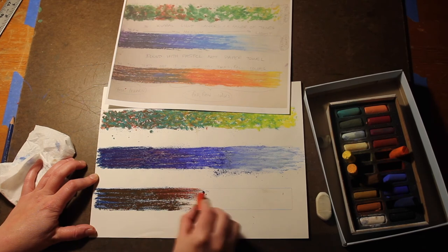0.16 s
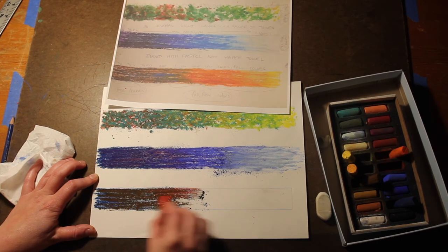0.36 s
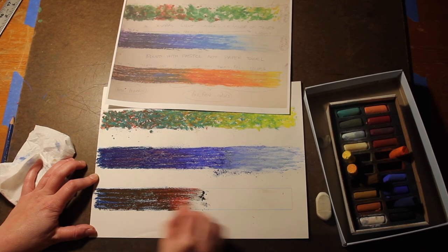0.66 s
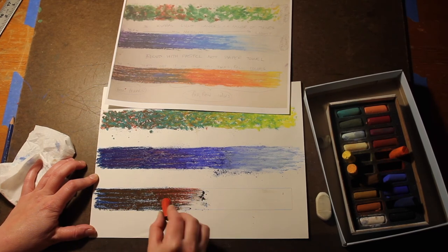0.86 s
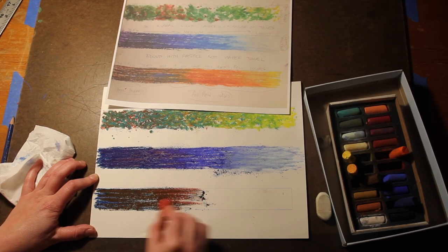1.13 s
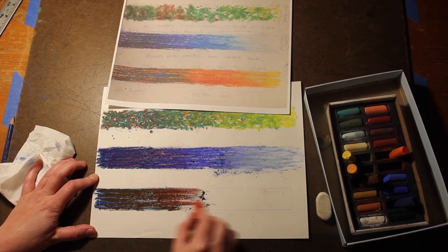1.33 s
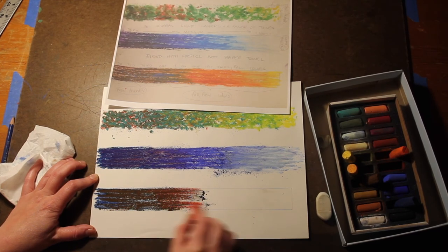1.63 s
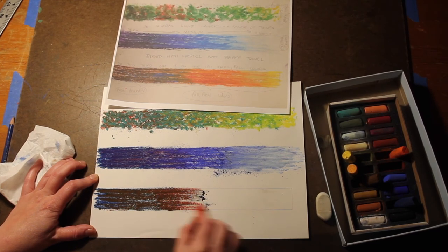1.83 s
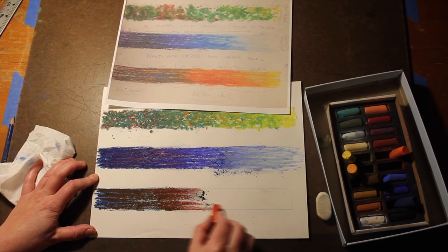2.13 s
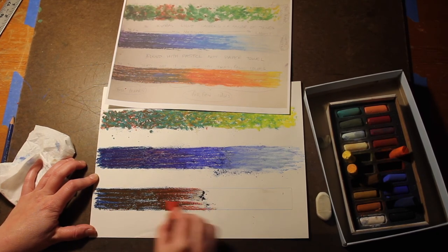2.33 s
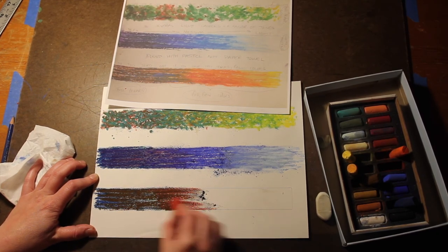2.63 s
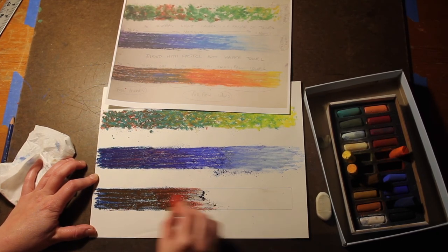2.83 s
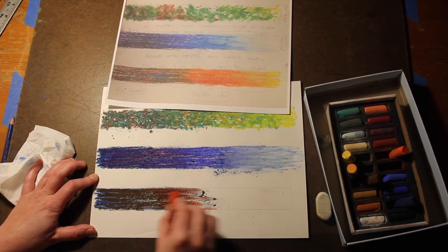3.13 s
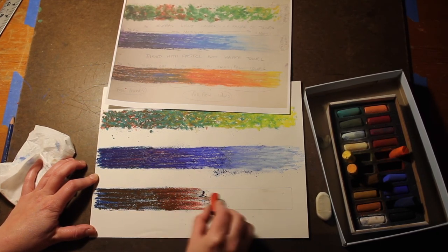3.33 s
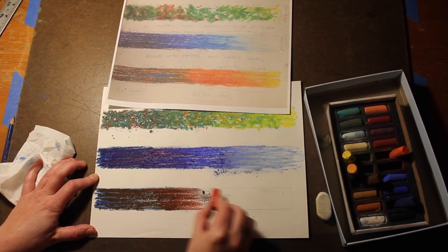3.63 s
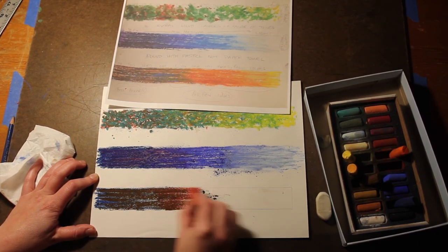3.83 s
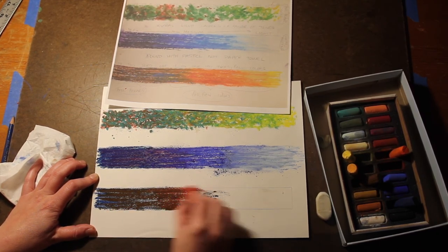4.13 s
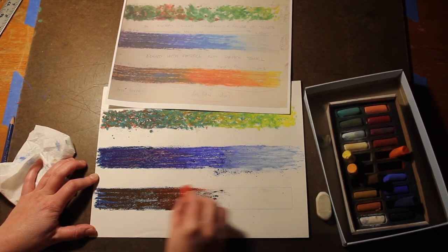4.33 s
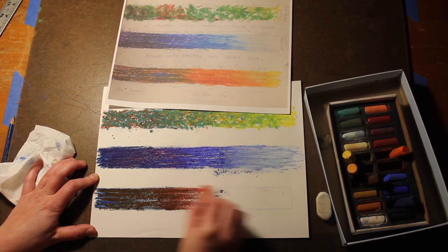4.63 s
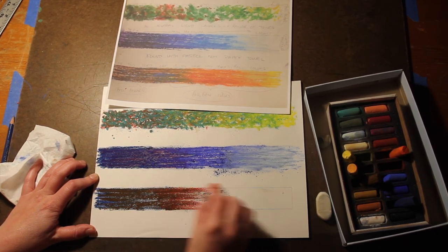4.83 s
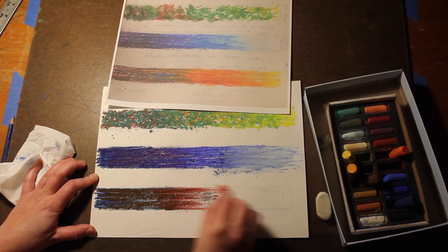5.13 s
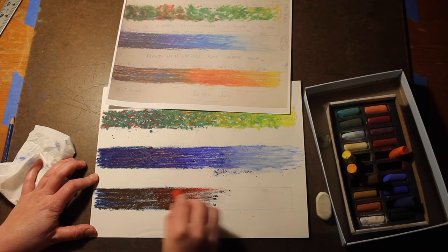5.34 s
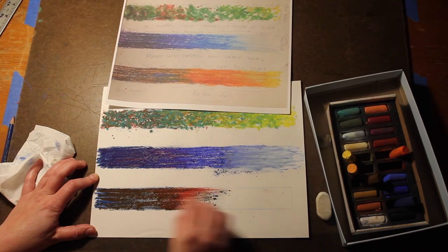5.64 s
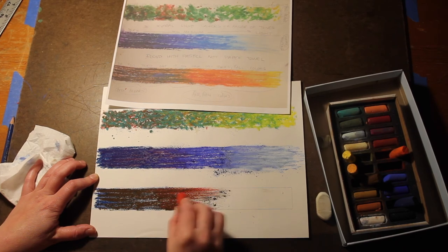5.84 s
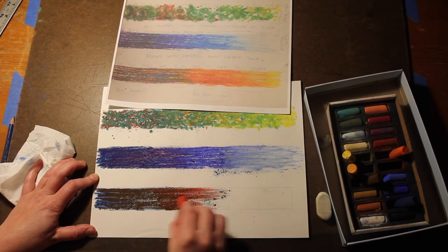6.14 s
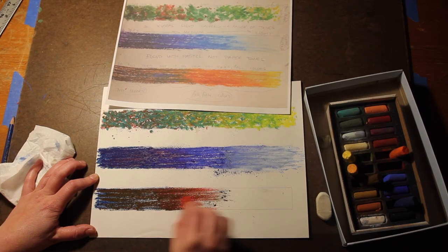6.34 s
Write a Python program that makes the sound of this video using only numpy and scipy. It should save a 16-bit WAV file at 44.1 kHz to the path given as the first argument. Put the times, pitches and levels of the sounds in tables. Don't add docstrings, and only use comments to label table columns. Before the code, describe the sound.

Quick repeated strokes of a chalky stick on paper, each about a tenth of a second, gritty and dry, with wooden resonance below fine fibre and dust hiss. Loud taps mark some landings early on, then mostly plain scratching until a firm tap near the end; late strokes swell harder. Beneath is a quiet, hollow fan and duct hum in a small-tailed room, heard close from above with thin bass.

```python
import sys
import numpy as np
from scipy import signal
from scipy.fft import rfft, irfft
from scipy.io import wavfile
from scipy.ndimage import uniform_filter1d

SR = 44100
rng = np.random.default_rng(int(sys.argv[2]) if len(sys.argv) > 2 else 0)


def boost(x):
    u = np.asarray(x, float) / 20
    return 10 ** u


def store_wav(level_fs):
    pcm = np.round(np.clip(np.atleast_2d(level_fs), -1, 1) * 32767)
    wavfile.write(sys.argv[1], SR, pcm.T.astype(np.int16))


N = 285768


def level(x, db):
    return x * boost(db) / np.sqrt(np.mean(x ** 2))


def colour(x, points):
    hz, db = np.transpose(points)
    axis = np.maximum(np.arange(len(x) // 2 + 1) * SR / len(x), 1)
    gain_db = np.interp(np.log(axis), np.log(hz), db)
    return irfft(rfft(x) * boost(gain_db), len(x))


def walk(rate):
    hold = int(SR / rate)
    steps = np.repeat(rng.standard_normal(N // hold + 1), hold)
    return 1.55 * uniform_filter1d(uniform_filter1d(steps, hold), hold)[:N]


def mottle(x, db, size, hold):
    spec = signal.stft(x, nperseg=size)[2]
    field = uniform_filter1d(rng.standard_normal(spec.shape), hold, axis=1)
    field = uniform_filter1d(field, 2, axis=0)
    patchy = spec * boost(db * field / np.std(field))
    return level(signal.istft(patchy, nperseg=size)[1][:N], 0)


def resonate(x, modes):
    out = 0
    for hz, width, db in modes:
        b, a = signal.iirpeak(hz, hz / width, SR)
        twice = signal.lfilter(b, a, signal.lfilter(b, a, x))
        out = out + level(twice, db)
    return out


def bell(x, centre, width):
    return np.exp(-((x - centre) / width) ** 2 / 2)


# (f/Hz, level/dB)
AIR_SPECTRUM = [(40, -60.5), (110, -38), (240, -24), (300, -16.5), (530, -15), (560, -9), (790, -1),
                (1030, -6.5), (1110, -17.5), (2400, -27), (4700, -39.5), (6500, -43.5), (11000, -52.5),
                (16000, -67)]
# (f/Hz, width/Hz, level/dB)
DUCT_MODES = [(667.2, 29, -57.5), (738.4, 27, -56), (798.5, 20, -57), (866, 56, -81.5), (1017, 49, -60),
              (4140, 500, -78.5), (8080, 310, -103)]
# (t/s, drone level/dB, rumble level/dB)
DUCT_DRIFT = [
    (0.0, -48.5, -78),
    (2.29, -49, -73.5),
    (2.56, -48.5, -104),
    (2.99, -49, -88),
    (3.9, -49.5, -84.5),
    (4.389, -49, -104),
    (4.76, -49, -83),
    (5.38, -49.5, -91),
    (5.68, -48.5, -81),
    (6.48, -49, -86),
]
# (f/Hz, level/dB)
FAN_TONES = [(91.5, -74.5), (577, -58.5)]


def ventilation():
    t = np.arange(N) / SR
    s, drone_db, rumble_db = np.transpose(DUCT_DRIFT)
    swell = boost(np.interp(t, s, drone_db - np.mean(drone_db)))
    rumble = boost(np.interp(t, s, rumble_db - np.max(rumble_db)))
    patchy_air = mottle(rng.standard_normal(N), 4.04, size=1024, hold=4)
    air = level(colour(patchy_air, AIR_SPECTRUM), -49.5)
    duct = resonate(rng.standard_normal(N), DUCT_MODES)
    tones = []
    for hz, db in FAN_TONES:
        phase = 2 * np.pi * np.cumsum(hz + 0.4 * walk(5)) / SR
        tones.append(boost(db + 0.7 * walk(6)) * np.sin(phase))
    shaft, blade = tones
    return swell * (air + duct + blade) + rumble * shaft


def grit(spread_db, flicker_db, rate):
    size = boost(spread_db * rng.exponential(1, N))
    return level(rng.standard_normal(N) * size * boost(flicker_db * walk(rate)), 0)


def sweep(age, rise_s, length_s, swell_db, fall_db_per_s, knee_s):
    rise = (1 - np.exp(-age / rise_s)) / (1 - np.exp(-length_s / rise_s))
    slant_db = swell_db * (np.minimum(age / length_s, 1) - 1)
    fall_db = fall_db_per_s * knee_s * np.logaddexp(0, (age - length_s) / knee_s)
    return rise ** 2 * boost(slant_db - fall_db)


def contact_span(s):
    at = slice(max(int(s * SR), 0), min(int(s * SR) + SR // 2, N))
    return at, np.maximum(np.arange(N)[at] / SR - s, 0)


# (t/s, contact/s, lift-off level/dB, swell over the contact/dB, early low modes over pressure/dB)
STROKES = [(-0.16, 0.097, -28.0, 5, -4.0), (0.139, 0.068, -29, -1, -9.5), (0.42, 0.075, -27.5, 2.5, -6),
           (0.689, 0.073, -26.6, 4.2, -5), (1.008, 0.046, -24, 10.5, -11), (1.25, 0.13, -30, -2, -8.2),
           (1.537, 0.11, -25, 8, -13), (1.813, 0.12, -28, -0.9, -9.5), (2.101, 0.12, -28, -2.5, -10.5),
           (2.402, 0.083, -28, 0, -5.5), (2.686, 0.078, -29, 1, -6), (2.969, 0.088, -27, 5.1, -6.8),
           (3.267, 0.088, -30, -3, -5), (3.558, 0.08, -28, 3.5, -3.4), (3.867, 0.074, -25, 9, -9.5),
           (4.184, 0.077, -28.5, 2.5, -13), (4.505, 0.09, -28.3, 9, -7.5),
           (4.841, 0.064, -27.5, 15.5, -9.5), (5.128, 0.078, -23.5, 12.5, -6.5),
           (5.411, 0.087, -21.5, 16.5, -8.5), (5.675, 0.085, -21.5, 16.5, -8.5), (5.962, 0.077, -26, 3, -5),
           (6.214, 0.076, -23, 13.5, -9.5)]
# (t/s, speed-up/s, slide/s, hiss level at top speed/dB, upper modes over pressure/dB)
SLIDES = [(-0.15, 0.02, 0.095, -35.5, -2), (0.145, 0.013, 0.096, -40.5, 3.5),
          (0.428, 0.015, 0.099, -38.5, 2), (0.691, 0.081, 0.09, -34.5, 1.5),
          (1.011, 0.012, 0.07, -37.5, 1.5), (1.243, 0.093, 0.13, -38, -1.7),
          (1.555, 0.023, 0.11, -37.5, 0.8), (1.812, 0.096, 0.11, -35.5, 0),
          (2.105, 0.017, 0.12, -37.5, 0.9), (2.409, 0.017, 0.095, -37, 1.5),
          (2.678, 0.087, 0.097, -36.5, 1.5), (2.968, 0.055, 0.099, -35, 1.4), (3.264, 0.046, 0.093, -38, 0),
          (3.556, 0.083, 0.093, -36, 2), (3.867, 0.073, 0.083, -36.5, -1),
          (4.181, 0.047, 0.079, -34.5, 1.5), (4.529, 0.016, 0.1, -39, 1.0),
          (4.845, 0.046, 0.066, -35.5, 0.6), (5.136, 0.06, 0.075, -35, -1.3),
          (5.42, 0.032, 0.091, -35.5, -1.5), (5.677, 0.12, 0.089, -34, -0.8),
          (5.962, 0.043, 0.082, -34.5, 1.0), (6.226, 0.019, 0.083, -35.5, 0.4)]
# (t/s, depth 0-1.5)
BITES = [(0.17, 1.13), (0.448, 0.5), (0.72, 1.16), (1.037, 0.25), (1.283, 1.15), (1.555, 0.91),
         (1.849, 1.13), (2.127, 0.66), (2.429, 0.9), (2.717, 1.2), (3.0, 1.08), (3.299, 1.15),
         (3.588, 0.96), (3.896, 1.03), (4.208, 1), (4.533, 0.4), (4.872, 1.03), (5.159, 0.72),
         (5.447, 0.86), (5.707, 1.31), (5.992, 0.8), (6.244, 0.97)]


def pressure():
    t, out = np.arange(N) / SR, np.zeros((3, N))
    bite = sum(depth * bell(t, s, 0.0069) for s, depth in BITES)
    bite_db = 10, 4.5, 2
    fastest_db = -1, -2.5, 2
    for (s, length, db, swell_db, low_db), (*_, upper_db) in zip(STROKES, SLIDES):
        at, age = contact_span(s)
        low = low_db - 6.5 + 12.5 * np.exp(-age / 0.045)
        upper = upper_db - 0.44 - 7 * np.exp(-age / 0.012)
        tilt = np.array([low, 0 * age, upper])
        tilt = tilt + np.outer(fastest_db, bell(age / length, 0.65, 0.14))
        press = sweep(age, 0.0077, length, swell_db, fall_db_per_s=339.5, knee_s=0.0067)
        out[:, at] += boost(db + tilt) * press
    return out * boost(np.outer(bite_db, bite))


def speed():
    out = np.zeros((2, N))
    for s, rise_s, length, db, _ in SLIDES:
        at, age = contact_span(s)
        off_db = -2.5 * (1 + np.tanh((age - length - 0.015) / 0.004)) / 2
        slide = sweep(age, max(rise_s, 0.003), length, 0, fall_db_per_s=400, knee_s=0.011)
        hiss = boost(db + off_db) * slide
        dust_late_db = -4 * bell(age, 0, 0.012)
        out[:, at] += hiss, hiss * boost(dust_late_db)
    return out


# (delay t/s, level/dB)
ECHOES = [
    (.0036, -23.5),
    (.0064, -14.5),
    (0.013, -18),
]


def desk(modes, swell_s=0.00031):
    t = np.arange(SR // 10) / SR
    ring = np.zeros(len(t))
    for k, (hz, db, t60) in enumerate(modes):
        ring += (-1) ** k * boost(db - 60 * t / t60) * np.sin(2 * np.pi * hz * t)
    ring *= (1 - np.exp(-t / swell_s)) ** 2
    out = ring.copy()
    for delay, db in ECHOES:
        lag = int(delay * SR)
        out[lag:] += boost(db) * ring[:-lag]
    return out / np.sqrt(np.sum(out ** 2))


# (f/Hz, level/dB, t60/s)
DESK_MODES = [(1030, -13.5, 0.011), (1171, -10.5, 0.053), (1276, 0.5, 0.021), (1368, -3.5, 0.063),
              (1488, 0, 0.037), (1593, -2, 0.047), (1788, 3, 0.022), (1933, -10.5, 0.028),
              (2107, -3.5, 0.046), (2101, -5.5, 0.046), (2206, -7.5, 0.021), (2372, -7, 0.017),
              (2711, -4.5, 0.015), (2953, -9.5, 0.016), (3195, -11, 0.022), (3530, -10.5, 0.011),
              (3950, -9.5, 0.0063)]
# (f/Hz, level/dB per Hz)
SHEET_BODY = [(59, -75), (100, -29), (450, -11.5), (646, -4.5), (956, 4.5), (1010, 8.5), (1100, 3),
              (1430, -30), (2420, -120)]
# (f/Hz, level/dB per Hz)
FIBRE_HISS = [(2500, -21), (3800, 4.5), (5000, 6.5), (7500, 0.5), (9000, -30.5), (12000, -46)]
# (f/Hz, width/Hz, level/dB)
STICK_MODES = [(4410, 280, 2.5), (5046, 110, 0.5), (5450, 56, 7.5), (6670, 200, -5.5), (7180, 180, 4),
               (7950, 200, -1), (8790, 300, -36), (9880, 230, -6), (11000, 370, -9.5)]
# (f/Hz, level/dB per Hz)
DUST_HISS = [(6000, -24), (8500, 2), (10000, -2.5), (12500, -9), (15000, -15.5), (16500, -19)]


def strokes():
    low, middle, upper = pressure()
    fibre, late = speed()
    dust = late * (fibre / boost(-41.5)) ** 0.23
    rub = mottle(grit(2.1, 0.76, 150), 2.05, size=512, hold=5)
    out = signal.fftconvolve(low * rub, desk(DESK_MODES[:2]))[:N]
    out += signal.fftconvolve(middle * boost(0.25) * rub, desk(DESK_MODES[2:7]))[:N]
    out += signal.fftconvolve(upper * boost(-1.15) * rub, desk(DESK_MODES[7:]))[:N]
    out = colour(out, [(700, -14), (1000, 4.0), (1090, 0.5), (1200, -1.0)])
    out += low * level(colour(grit(2.1, 1.03, 60), SHEET_BODY), -11)
    slips = mottle(grit(0.93, 1.0, 200), 2.86, size=512, hold=3)
    out += fibre * level(colour(slips, FIBRE_HISS), -0.8)
    out += fibre * level(resonate(slips, STICK_MODES), -10)
    return out + dust * level(colour(slips, DUST_HISS), -5)


# (t/s, peak level/dB)
TOUCHES = [(0.421, -44), (0.6414, -67), (0.6937, -57), (1.253, -52), (1.529, -49), (1.819, -50.5),
           (2.096, -47), (2.4, -46), (3.2007, -68), (4.18, -54), (4.4894, -72), (4.8442, -60),
           (5.1346, -56), (5.3294, -70), (5.683, -55), (6.217, -46)]


def touches(decay_s=0.0036):
    t, out = np.arange(SR // 50) / SR, np.zeros(N)
    brushes = [(row[0] + 0.0043, -63.5) for row in STROKES[1:]]
    for s, db in list(TOUCHES) + brushes:
        at = int(s * SR)
        out[at:at + len(t)] += boost(db + 5) * rng.standard_normal(len(t)) * np.exp(-t / decay_s)
    return colour(out, [(500, 4), (1500, 3), (5000, 5), (11000, -16), (16000, -16)])


# (t/s, peak level/dB, brightness/dB per octave)
TAPS = [
    (0.4229, -1.5, 0.5),
    (0.7013, -15.5, -3),
    (1.2544, -28, 9),
    (1.53, -7.5, -1.5),
    (2.096, -3, 0.3),
    (2.4008, -2, -1.2),
    (4.1804, -11.5, -2),
    (4.509, -37, -2),
    (6.2172, -4.5, -4.5),
]
# (f/Hz, level/dB, t60/s)
KNOCK_MODES = [(1110, -5.7, .028), (1390, -18.2, .026), (1480, 5, .015), (1600, -6, .023),
               (1800, -12.4, .05), (1870, -17.4, .05), (2280, -2.3, .013), (2360, -4.7, .01),
               (2540, -11.4, .021), (2830, .9, .01), (3400, -14.6, .018), (3930, -23.6, .017),
               (5450, -40, .008), (7100, -44, .007)]


def taps():
    out = np.zeros(N + SR)
    hz, mode_db, t60 = np.transpose(KNOCK_MODES)[:, :, None]
    travel_s = 0.00182 * np.sqrt(1500 / hz)
    t = np.maximum(np.arange(SR // 10) / SR - travel_s, 0)
    for s, db, bright_db in TAPS:
        gain = boost(mode_db + bright_db * np.log2(hz / 1500) - 60 * t / t60)
        swell = 1 - np.exp(-t / 0.00124)
        blow = np.sum(gain * np.sin(2 * np.pi * hz * t) * swell, axis=0)
        at = int((s - 0.002) * SR)
        out[at:at + len(blow)] += boost(db) * blow / np.max(np.abs(blow))
    return signal.lfilter(*signal.butter(2, 750, "high", fs=SR), out[:N])


def room(x, t60_s=0.16, tail_db=-19):
    t = np.arange(SR // 2) / SR
    build_up = np.clip(t / 0.031, 0, 1)
    tail = rng.standard_normal(len(t)) * boost(-60 * t / t60_s) * build_up
    tail = colour(tail, [(500, 0.0), (3000, -5), (7000, -10), (12000, -23)])
    return signal.fftconvolve(x, boost(tail_db) * tail / np.sqrt(np.sum(tail ** 2)))[:N]


def scene():
    pastel = strokes() + touches() + taps()
    return (ventilation() + pastel + room(pastel))[None]


def roll_off(x):
    return signal.sosfilt(signal.butter(12, 16130, fs=SR, output="sos"), x)


# (f/Hz, level/dB)
MICROPHONE = [(30, -9.5), (100, -6), (250, -0.5), (15700, 1), (16100, -30)]


def record(dry):
    mix = colour(dry[0], MICROPHONE)[None]
    return roll_off(mix)


dry = scene()
out = record(dry)
store_wav(out)
```